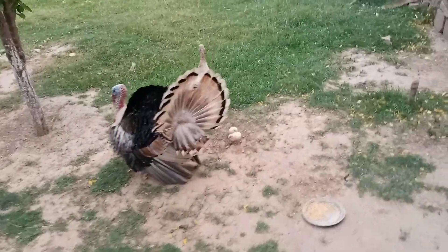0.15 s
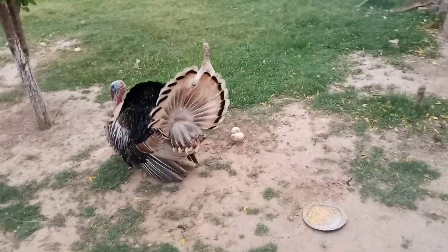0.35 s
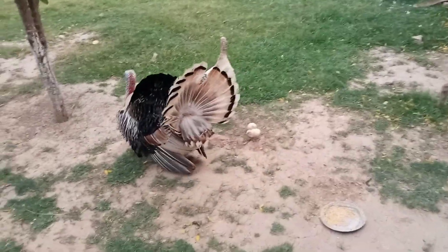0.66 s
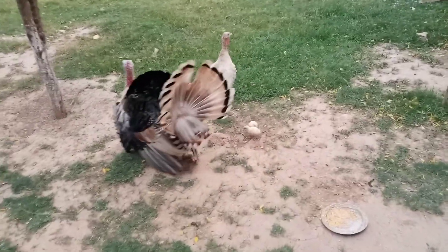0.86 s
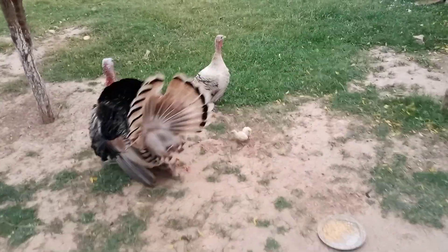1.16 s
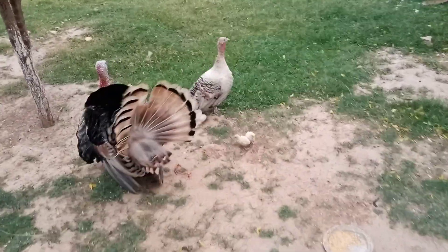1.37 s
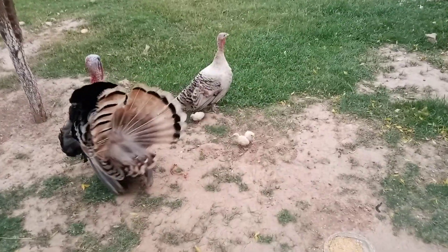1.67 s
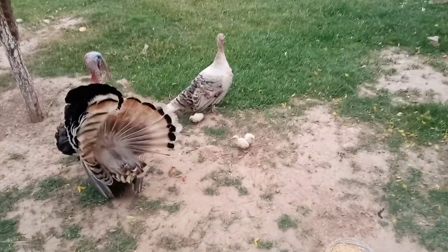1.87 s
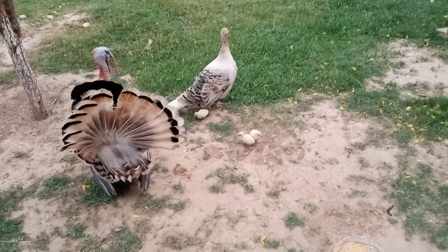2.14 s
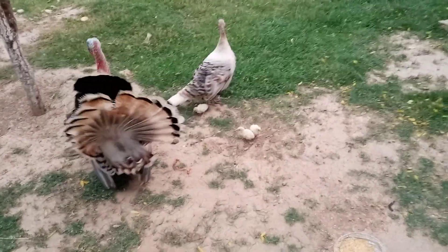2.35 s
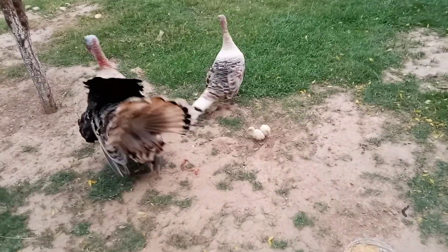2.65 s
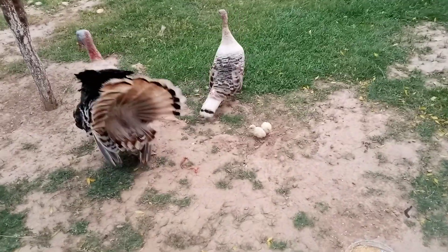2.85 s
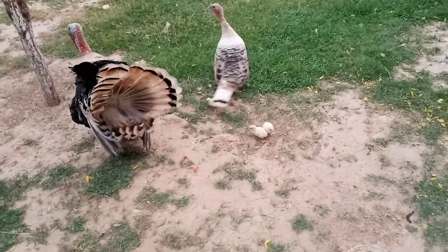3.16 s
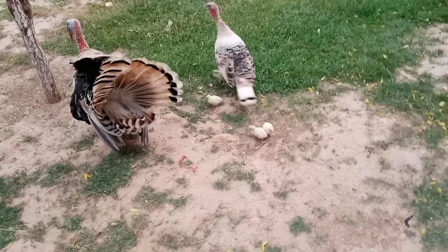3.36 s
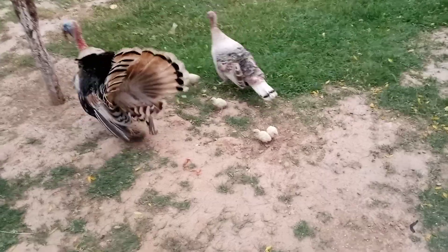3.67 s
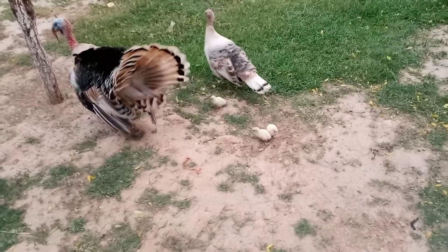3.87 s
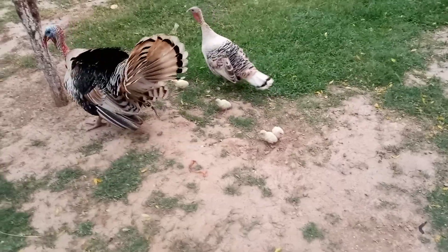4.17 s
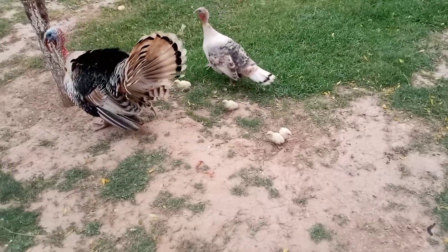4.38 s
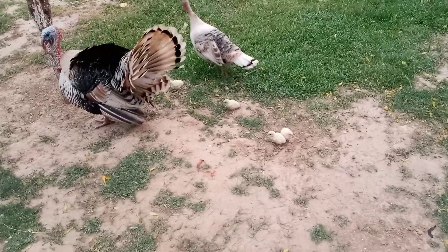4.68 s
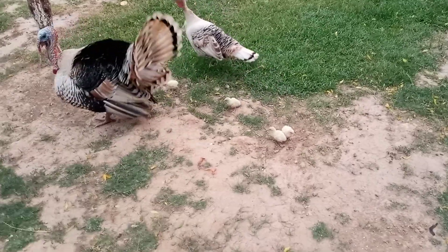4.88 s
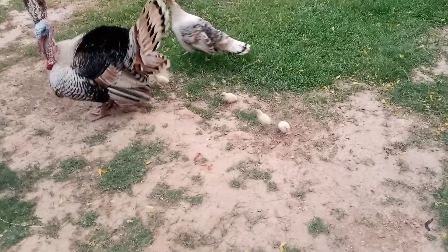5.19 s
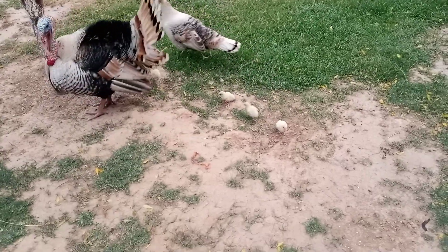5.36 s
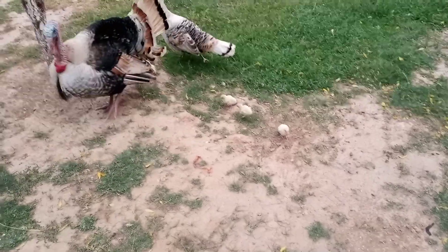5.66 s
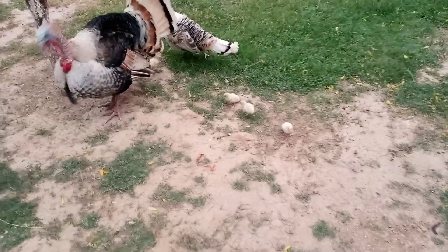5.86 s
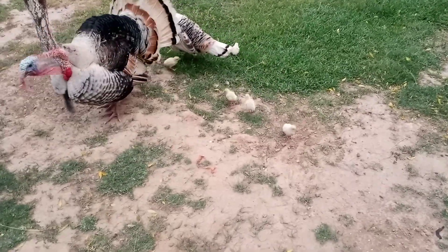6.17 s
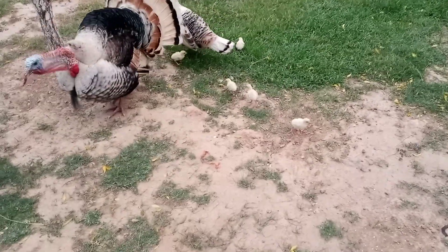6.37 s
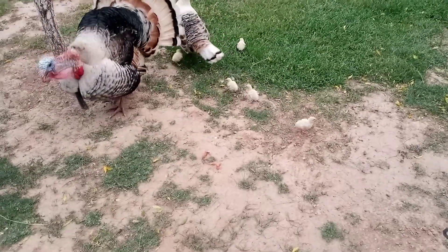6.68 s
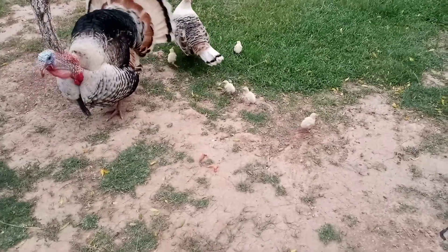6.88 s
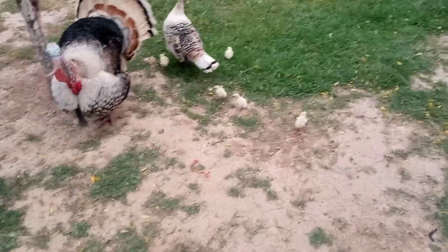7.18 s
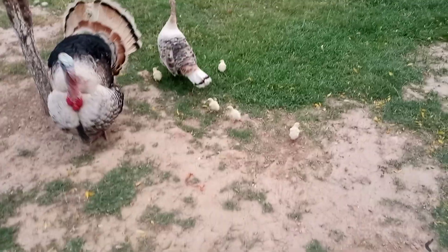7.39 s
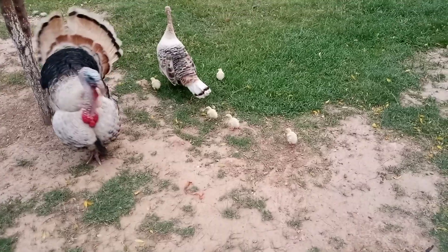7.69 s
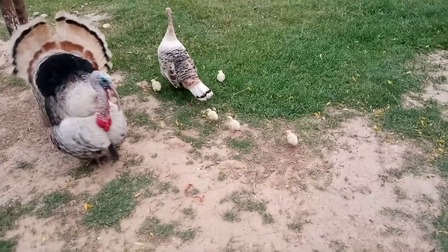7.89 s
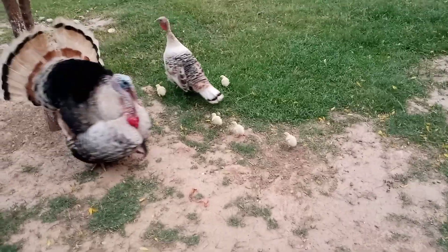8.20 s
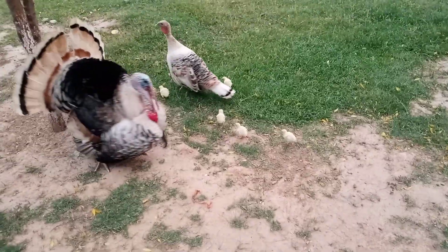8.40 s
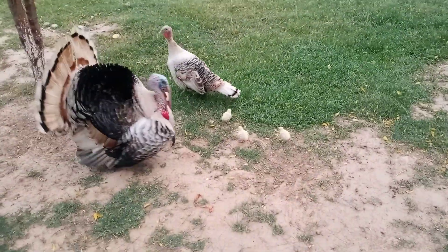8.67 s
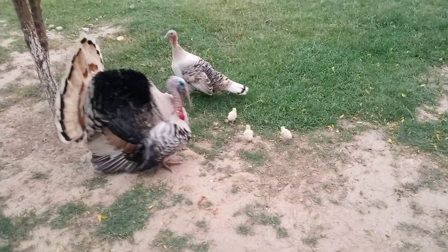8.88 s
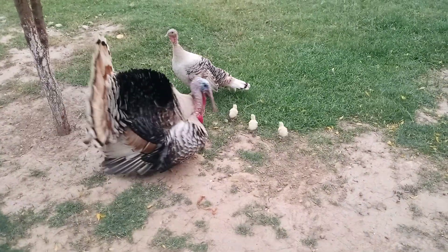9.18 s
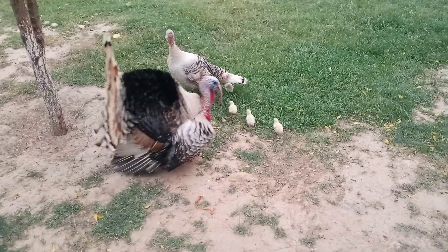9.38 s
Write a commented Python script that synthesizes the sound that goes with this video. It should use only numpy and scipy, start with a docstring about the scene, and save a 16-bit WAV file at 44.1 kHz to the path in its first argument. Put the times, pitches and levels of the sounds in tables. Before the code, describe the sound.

In a quiet farmyard, small birds cheep faintly over a soft hush, and there is one short gritty scuff. Puffs of wind thump on the microphone while turkey chicks peep and a hen turkey begins soft, falling yelps. Just past the middle, a male turkey gives one loud rattling gobble nearby, trailing off into gulps and squeaks. The yelps and cheeps carry on, with a few more wind thumps.

```python
"""A quiet hush lies over a farmyard lawn, with faint cheeps of small birds and one short scuff.
Puffs of air thump on the microphone, a hen turkey gives soft falling yelps and poults peep.
Then a tom gobbles once: three yaps, a cry, a rattle, a second cry, and gulps, squeaks and grunts.
His syrinx supplies clear or rough harmonics, which the resonance of his throat shapes;
the other birds sing gliding tones with a hoarse edge. The yard answers with a faint echo."""
import sys
import numpy as np
from scipy import signal
from scipy.fft import rfft, irfft, next_fast_len
from scipy.io import wavfile
from scipy.ndimage import uniform_filter1d, map_coordinates

SR = 44100
rng = np.random.default_rng(int(sys.argv[2]) if len(sys.argv) > 2 else 0)


def transcribe(signal):
    """Save signal, clipped to [-1, 1], as a 16-bit WAV file at the path in sys.argv[1]."""
    frames = np.atleast_2d(signal).T
    limited = np.clip(frames, -1, 1)
    pcm = np.round(limited * 32767).astype(np.int16)
    wavfile.write(sys.argv[1], SR, pcm)


N = 420713


def amp(db):
    """Amplitude ratio of a level in decibels."""
    return 10 ** (np.asarray(db) / 20)


def unit(x):
    """Normalisation to rms 1."""
    return x / np.sqrt(np.mean(x ** 2) + 1e-20)


def along(points, hz):
    """Interpolation of (Hz, value) points on a logarithmic frequency axis."""
    f, v = np.transpose(points)
    return np.interp(np.log(hz + 1), np.log(f + 1), v)


def wobble(rate, size):
    """Smooth random modulation: a spline through rate knots a second."""
    knots = rng.standard_normal(int(size * rate / SR) + 4)
    return map_coordinates(knots, [np.arange(size) * rate / SR])


def filtered(x, response):
    """Linear filtering: the spectrum is multiplied by a frequency response."""
    m = next_fast_len(len(x) + 8192)
    return irfft(rfft(x, m) * response(np.fft.rfftfreq(m, 1 / SR)), m)[:len(x)]


def noise(spectrum):
    """Spectral shaping of white noise, rms 1."""
    return unit(filtered(rng.standard_normal(N), lambda hz: amp(along(spectrum, hz))))


def add(track, s, sound):
    """Superposition of a sound on the track at s seconds."""
    part = track[max(round(s * SR), 0):][:len(sound)]
    part += sound[:len(part)]


def glide(length, *pitches):
    """Linear glide through evenly spaced pitches, one value a sample."""
    return np.interp(np.linspace(0, 1, int(length * SR)), np.linspace(0, 1, len(pitches)), pitches)


def arch(n, crest, fullness):
    """Amplitude envelope: a skewed half sine that peaks at the fraction crest of its length."""
    u = np.interp(np.linspace(0, 1, n), [0, crest, 1], [0, .5, 1])
    return np.abs(np.sin(np.pi * u)) ** fullness


def partial(phase, rough, width):
    """Line broadening: roughness moves power from a sinusoid into a narrow band of noise."""
    r, n = np.clip(rough, 0, 1), len(phase)
    smear = wobble(width, n) * np.sin(phase) + wobble(width, n) * np.cos(phase)
    return np.sqrt(2 * (1 - r ** 2)) * np.sin(phase) + r * smear


def reflection(x, delay_s, corner_hz):
    """Specular reflection: a delayed copy with less treble."""
    return filtered(x, lambda f: np.exp(-2j * np.pi * f * delay_s) / (1 + (f / corner_hz) ** 2))


# Spectrum of the hush. Each row: frequency in Hz, relative density in dB.
HUSH_SPECTRUM = [(88, -20), (150, -7), (210, -1.5), (280, -0.5), (325, -1.5), (412, -3.5), (907, -4),
                 (1900, -3.5), (2370, -2.5), (3200, -8), (3610, -6), (5400, -10.5), (6950, -11.5),
                 (7310, -14.5), (8360, -36.5), (10900, -69), (18400, -120)]
def hush(level_db=-56, early_db=2.07, settle_s=0.6):
    """Distant leaves and open air sum to broadband noise, a little stronger at first."""
    settling_db = early_db * np.exp(-(np.arange(N) / SR / settle_s) ** 2)
    return amp(level_db + settling_db + 0.4 * wobble(13, N)) * noise(HUSH_SPECTRUM)


# Reverberation of the yard. Each row: frequency in Hz, time to decay by 60 dB in seconds.
YARD_DECAY = [(300, 0.17), (1000, 0.69), (2500, 0.67), (8000, 0.17)]
def yard(x, tail_db=-19, wall_db=-20, wall_delay_s=0.034):
    """Reflection from a wall gives one soft echo; scattering by trees and ground gives a thin tail."""
    hz, t, spectra = signal.stft(rng.standard_normal(SR // 2), SR, nperseg=256)
    decay = amp(-60 * t / along(YARD_DECAY, hz)[:, None])
    tail = signal.istft(spectra * decay, SR, nperseg=256)[1]
    scatter = signal.fftconvolve(x, tail / np.linalg.norm(tail))[:N]
    return amp(tail_db) * scatter + amp(wall_db) * reflection(x, wall_delay_s, corner_hz=3500)


def ground(x, bounce_db=-13, delay_s=0.002287, patter_db=-15, patter_t60=0.14):
    """The soil's reflection interferes with the call; a trunk and nearby ground scatter it briefly."""
    t = np.arange(SR // 12) / SR
    patter = rng.standard_normal(len(t)) * amp(-60 * t / patter_t60) * (t > .005)
    scatter = signal.fftconvolve(x, patter / np.linalg.norm(patter))[:N]
    return x + amp(bounce_db) * reflection(x, delay_s, corner_hz=4000) + amp(patter_db) * scatter


# Puffs of air. Each row: end of the rise in seconds, hold in seconds, level in dB.
AIR_PUFFS = [(2.205, .1, -44), (2.36, 0.075, -50), (2.518, 0.085, -64), (3.096, 0.022, -40),
             (3.203, 0.023, -47.5), (3.436, .9, -60), (3.619, 0.036, -51), (3.754, 0.03, -59),
             (4.184, 0.041, -41.5), (4.765, 0.22, -48), (7.207, 0.081, -41), (7.502, 0.12, -54.5),
             (7.875, .075, -39), (8.034, 0.2, -40.5), (8.328, 0.18, -58.5)]
# Spectra of the rumble and of small eddies. Each row: frequency in Hz, relative density in dB.
RUMBLE_SPECTRUM = [(20, -51), (35, -12.5), (55, -2.5), (95, 1), (140, -2.5), (230, -13.5), (430, -28),
                   (600, -35.5), (1200, -89)]
EDDY_SPECTRUM = [(90, -24.5), (180, -2.5), (280, -1), (450, -5.5), (620, -20), (1100, -69.5)]
# The sharpest eddies. Each row: centre time in seconds, envelope peak in dB.
EDDY_THUMPS = [(2.221, -31), (2.255, -30), (2.294, -28.5), (3.113, -26), (3.218, -31), (3.64, -37),
               (3.953, -43), (4.204, -25.5), (4.805, -32), (4.964, -32), (7.252, -33.5), (7.929, -23.5),
               (8.05, -26.5)]
def buffeting(calm_db=-65, attack_s=0.0075, release_db_per_s=190, eddy_db=-52, eddy_growth=1.48,
              thump_hz=175, thump_cycles=0.3):
    """Turbulent pressure rumbles on the microphone; strong puffs are brighter, and sharp eddies thump."""
    flow = amp(calm_db + wobble(4, N))
    t = np.arange(2 * SR) / SR
    for s, hold, db in AIR_PUFFS:
        release_db = release_db_per_s * np.clip(t - attack_s - hold, 0, None)
        add(flow, s - attack_s, np.minimum(t / attack_s, 1) * amp(db - release_db))
    eddy_gain = amp(eddy_db + 6.2 * wobble(45, N)) * (flow / flow.max()) ** eddy_growth
    out = eddy_gain * noise(EDDY_SPECTRUM)
    out += flow * amp(3.7 * wobble(35, N)) * noise(RUMBLE_SPECTRUM)
    t = np.arange(-SR // 40, SR // 40) / SR
    bell = np.exp(-.5 * (t * thump_hz / thump_cycles) ** 2)
    for s, db in EDDY_THUMPS:
        push = bell * np.cos(2 * np.pi * thump_hz * t + rng.uniform(0, 2 * np.pi))
        add(out, s + t[0], amp(db) * push)
    return out


# Strokes of the scuff. Each row: start in seconds, level in dB, time to decay by 60 dB in seconds.
SCUFF_STROKES = [(0.5, -37, 0.075), (0.519, -45, 0.35)]
# Spectrum of the scrape. Each row: frequency in Hz, relative density in dB.
GRIT_SPECTRUM = [(29, -45), (50, 5), (244, -1), (863, -5.5), (2030, -9.5), (3550, -10), (5220, -16),
                 (6890, -12), (8360, -46), (10900, -74), (18400, -120)]
def scuff():
    """Gritty friction noise decays exponentially: a sharp start, then a softer drag."""
    out, t = np.zeros(N), np.arange(SR // 2) / SR
    for s, db, t60 in SCUFF_STROKES:
        add(out, s, amp(db - 60 * t / t60))
    return out * noise(GRIT_SPECTRUM)


# Hoarse edge of the high calls. Each row: frequency in Hz, relative density in dB.
RASP_SPECTRUM = [(1500, -50), (3000, -15.5), (4300, 6.5), (5500, -2), (6600, 1.5), (7500, -5), (8400, -21)]
def rasp():
    """The aperiodic part of a bird's voice: a band of treble noise."""
    return noise(RASP_SPECTRUM)


def peep(pitch, rough, edge, edge_db=-10, flutter_db=3.0):
    """Random frequency and amplitude modulation make a hoarse-edged whistle waver."""
    n = len(pitch)
    phase = 2 * np.pi * np.cumsum(pitch * (1 + .006 * wobble(90, n))) / SR
    swell = amp(flutter_db * wobble(67.4, n)) * arch(n, crest=.5, fullness=.5)
    start = rng.integers(N - n)
    tone = partial(phase, rough, width=700 + 1800 * rough ** 2)
    return swell * (tone + amp(edge_db) * edge[start:start + n])


# Rising cheeps; the row at 5.15 s is instead a thin rising line that sounds with the hen's yelp at 5.135 s.
# Each row: start in seconds, top pitch in Hz, level in dB.
RISING_CHEEPS = [(.2, 4050, -56), (.5, 4000, -56.5), (0.821, 3900, -59), (1.79, 3680, -63),
                 (2.4, 3740, -58.5), (2.74, 3720, -67), (2.952, 4250, -63), (3.225, 4530, -56),
                 (3.601, 4280, -56), (5.15, 4630, -52), (7.8, 4570, -61.5), (8.57, 4860, -64),
                 (8.92, 3590, -60.5)]
# Hoarse falling chirps, and at 5.291 s one short beak tick played as a 9 ms sweep. Each row: start in seconds,
# length in seconds, level in dB.
CHIRPS_AND_TICK = [(0.777, 0.076, -54.5), (1.51, 0.075, -60.5), (2.374, 0.09, -63.5), (3.11, 0.095, -61),
                   (3.889, 0.078, -54.5), (5.291, .009, -47.5), (5.4, 0.17, -54), (5.611, 0.087, -50.5),
                   (6.871, 0.067, -55), (9.019, 0.053, -54.5)]
# Thin arching whistles. Each row: start in seconds, top pitch in Hz, level in dB.
THIN_WHISTLES = [(1.4, 7050, -62), (2.69, 6500, -64.5), (3.362, 6910, -47.5), (8.589, 7180, -65),
                 (8.92, 7100, -65.5), (9.23, 7400, -67)]
def small_birds(cheep_s=.098, cheep_rise=.1, chirp_top_hz=5500, chirp_end_hz=3800,
                whistle_s=.095, whistle_arch=.025, blur_per_db=.065, far_db=-64, far_count=64):
    """Frequency sweeps make cheeps, chirps and whistles; farther birds cheep faintly at random."""
    out, edge = np.zeros(N), rasp()
    rising = lambda length, hz: glide(length, hz * (1 - cheep_rise), hz * (1 - cheep_rise / 4), hz)
    for s, hz, db in RISING_CHEEPS:
        blur = np.clip(.15 + blur_per_db * (-49.5 - db), .1, .8)  # distance blurs the faint ones
        add(out, s, amp(db) * peep(rising(cheep_s, hz), blur, edge))
    for s, length, db in CHIRPS_AND_TICK:
        add(out, s, amp(db) * peep(glide(length, chirp_top_hz, chirp_end_hz), .92, edge, edge_db=-9.5))
    for s, hz, db in THIN_WHISTLES:
        foot_hz = hz * (1 - whistle_arch)
        add(out, s, amp(db) * peep(glide(whistle_s, foot_hz, hz, foot_hz), 0.64, edge, edge_db=-5.5))
    for when, span, height in rng.random((far_count, 3)):
        pitch = rising(.05 + .05 * span, 3500 + 1300 * height)
        add(out, when * N / SR, amp(far_db) * peep(pitch, .55, edge))
    return out


# Near peeps. Each row: start in seconds, length in seconds, held pitch in Hz, level in dB.
POULT_PEEPS = [(3.401, .118, 4760, -48.5), (3.674, 0.19, 4760, -50.5), (4.01, 0.17, 4750, -48),
               (4.384, .15, 4840, -52)]
# Steady side lines. Each row: frequency in sevenths of the held pitch, relative level in dB.
POULT_SIDEBANDS = [(6, -8.5), (9, -12.5), (10, -17.5)]
def poults(scoop=0.03, scoop_s=0.018, drop=0.43, drop_s=0.015, crescendo_db=6, rough=0.23):
    """A carrier with sidebands: each peep scoops up, grows as it holds, and drops as the sides fade."""
    out, edge = np.zeros(N), rasp()
    for s, length, hz, db in POULT_PEEPS:
        t = np.arange(int(length * SR)) / SR
        pitch = hz * (1 - scoop * np.exp(-t / scoop_s) - drop * np.exp((t - length) / drop_s))
        crescendo = amp(crescendo_db * (t / length - .5))
        carrier = crescendo * peep(pitch, rough, edge, edge_db=-10.5, flutter_db=3.5)
        sides = sum(amp(line_db) * peep(np.full(len(t), hz * k / 7), rough, edge)
                    for k, line_db in POULT_SIDEBANDS)
        add(out, s, amp(db) * (carrier + np.sin(np.pi * t / length) * sides))
    return out


# Yelps. Each row: start in seconds, length in seconds, opening pitch in Hz, late pitch in Hz,
# level in dB, relative overtone level in dB.
HEN_YELPS = [(2.857, .19, 1135, 812, -45.5, -19), (4.183, 0.2, 925, 834, -41.5, -17.5),
             (4.551, 0.16, 1060, 847, -35.5, -11), (4.841, .15, 900, 937, -32.5, -17.5),
             (5.135, .13, 886, 960, -33, -13), (5.447, .13, 925, 889, -35, -10.5),
             (6.232, 0.17, 1110, 834, -36, -17), (7.087, .174, 1145, 801, -36, -17.5),
             (7.474, .13, 1140, 813, -34.5, -18.5), (7.917, .14, 1130, 797, -37, -16.5),
             (9.278, .17, 930, 808, -42.5, -14.5)]
def hen(mid_hz=886, rest_hz=763, scoop=0.184, scoop_s=0.01124, fullness=0.67,
        third_db=-8, fourth_db=-22, break_db=-13, husk_db=-20):
    """Nearly pure yelps scoop up; overtones open as they fall, and period doubling breaks the end."""
    out, husk = np.zeros(N), rasp()
    for s, length, opening_hz, late_hz, db, overtone_db in HEN_YELPS:
        n = int(length * SR)
        u = np.linspace(0, 1, n)
        contour = np.interp(u, [.2, .5, .83, 1], [opening_hz, mid_hz, late_hz, rest_hz])
        pitch = uniform_filter1d(contour, size=700, mode="nearest") * (1 + .011 * wobble(121, n))
        phase = 2 * np.pi * np.cumsum(pitch * (1 - scoop * np.exp(-u * length / scoop_s))) / SR
        crest = np.clip(0.59 + 1.2 * max(-41.5 - db, 0), .1, .9)  # weak yelps peak later
        strain = np.clip(pitch - 930, 0, None)  # above its easy range the voice is thin and quiet
        swell = arch(n, crest, fullness) * amp(wobble(60, n) - 0.013 * strain)
        overtones = partial(2 * phase, .14, 250) + amp(third_db) * partial(3 * phase, .16, 250)
        overtones += amp(fourth_db) * partial(4 * phase, .4, 300)
        overtones += amp(husk_db) * np.roll(husk, rng.integers(N))[:n]
        crack = amp(break_db) * np.clip((u - .65) / 0.27, 0, 1) * partial(1.5 * phase, .22, 200)
        voice = partial(phase, .08, 150) + amp(overtone_db - 0.31 * strain) * overtones
        add(out, s, amp(db) * (swell * voice + np.sqrt(swell) * crack))
    return out


# Spectral envelope of the tom's throat. Each row: frequency in Hz, relative gain in dB.
THROAT_RESPONSE = [(300, -28.5), (480, -22), (650, 2.5), (1000, -2), (1350, -6.5), (2000, -5.5),
                   (2700, -5.5), (3300, -14), (4300, -17.5), (5000, -21), (5350, -15), (5750, -23),
                   (6900, -18), (8200, -45.5)]
# Windpipe resonances. Each row: centre in Hz, bandwidth in Hz, relative gain in dB.
WINDPIPE_MODES = [(1100, 75, 5.5), (1960, 69, 8.5), (2730, 32, 10), (4040, 170, -36), (6670, 2000, -46)]
def syrinx(pitch, db, throat_hz, lift_db, rough, jitter=0.013, half_width_hz=400, husk_db=-13,
           dulling=.29, second_ratio=0.79, second_db=-5, harmonics=14):
    """Source and filter: harmonics pass through the throat, whose resonance jumps as the neck shakes."""
    size = len(pitch)
    phase = 2 * np.pi * np.cumsum(pitch * (1 + jitter * rough * wobble(360, size))) / SR
    k = np.arange(1, harmonics + 1)[:, None]
    sway_db = np.array([wobble(45, size) for n in k]) * np.clip(k - 2, 0, 4)
    # Softer syllables lose their highest harmonics.
    soft_db = dulling * np.clip(db + 24, -14, 0) * np.clip((k * pitch - 3000) / 3000, 0, 1)
    resonance_db = lift_db / (1 + ((k * pitch - throat_hz) / half_width_hz) ** 4)
    gains = amp(along(THROAT_RESPONSE, k * pitch) + sway_db + soft_db + resonance_db)
    gains /= np.linalg.norm(gains, axis=0)
    voice = sum(gain * partial(n * phase + rng.uniform(0, np.pi), rough * n, width=480)
                for n, gain in enumerate(gains, 1))
    # Biphonation: in rough syllables the other side of the syrinx joins in at a lower pitch.
    second = sum(amp(along(THROAT_RESPONSE, ratio * pitch)) * partial(ratio * phase, 0.41, width=380)
                 for ratio in second_ratio * k[1:, 0])
    # Turbulence rings the windpipe.
    pipe = lambda f: sum(amp(gain_db) * 1j * f * width / (hz * hz - f * f + 1j * f * width)
                         for hz, width, gain_db in WINDPIPE_MODES)
    husk = unit(filtered(rng.standard_normal(size), pipe)) * amp(husk_db) * np.sqrt(2 * np.abs(rough))
    return amp(db) * (voice + amp(second_db) * rough * second + husk)


def syllable(db, length, first_hz, last_hz, throat_hz, lift_db, rough,
             crest=0.43, fullness=0.66, crest_db=1.0):
    """A short glide of the syrinx under an envelope that swells and sinks."""
    pitch = glide(length, first_hz, last_hz)
    swell = amp(crest_db) * arch(len(pitch), crest, fullness)
    return swell * syrinx(pitch, db, throat_hz, lift_db, rough)


# The falling flick that opens a gulp. In order: length in seconds, first and last pitch in Hz,
# throat resonance in Hz, its lift in dB, roughness from 0 to 1.
GULP_FLICK = (0.019, 1280, 920, 860, 12.7, 0.26)
# Gulps, a flick and its landing note. Each row: start in seconds, flick level in dB,
# first and last pitch of the landing in Hz, landing level in dB.
TOM_GULPS = [(6.09, -34.5, 608, 588, -34), (6.143, -28.5, 750, 645, -35), (6.364, -30, 916, 1062, -24.5),
             (6.523, -38.5, 636, 622, -44.5)]
# Squeaks. Each row: start and length in seconds, mid pitch in Hz, level in dB, throat resonance in Hz.
TOM_SQUEAKS = [(6.301, 0.013, 1350, -39, 2640), (6.516, 0.019, 1340, -45.5, 2720),
               (6.562, .02, 1345, -36.5, 2650), (6.741, 0.025, 1240, -43, 1270)]
# Grunts. Each row: start and length in seconds, mid pitch in Hz, level in dB.
TOM_GRUNTS = [(6.247, 0.035, 606.6, -29.5), (6.32, 0.019, 593, -31.5), (6.456, .046, 299.6, -39),
              (6.687, 0.045, 300.7, -39)]
def dying_away(landing_delay_s=0.015, landing_s=0.024, squeak_sag=0.033, grunt_sag=0.047):
    """Intermittent voicing: the gobble breaks up into separate gulps, squeaks and grunts."""
    out = np.zeros(N)
    for s, flick_db, first_hz, last_hz, landing_db in TOM_GULPS:
        add(out, s, syllable(flick_db, *GULP_FLICK))
        landing = syllable(landing_db, landing_s, first_hz, last_hz,
                           throat_hz=last_hz, lift_db=12.5, rough=0.16, crest=0.55)
        add(out, s + landing_delay_s, landing)
    for s, length, hz, db, throat_hz in TOM_SQUEAKS:
        add(out, s, syllable(db, length, hz * (1 + squeak_sag), hz * (1 - squeak_sag),
                             throat_hz, lift_db=7.5, rough=.06))
    for s, length, hz, db in TOM_GRUNTS:
        add(out, s, syllable(db, length, hz * (1 + grunt_sag), hz * (1 - grunt_sag),
                             throat_hz=590, lift_db=27, rough=0.12, fullness=0.51))
    return out


# The rattle's two notes. Each gives: length in seconds, first and last pitch in Hz,
# throat resonance in Hz, its lift in dB, roughness from 0 to 1.
HIGH_NOTE = (0.0088, 935, 885, 2200, 57, 0.13)
LOW_NOTE = (0.03, 745, 685, 370, 4.5, 0.28)
def rattle(start_s=5.843, period_s=.0485, first_db=-25.5, high_db=-3.5, flip_s=.01, fade_db=0.45):
    """Pitch alternation: a short high note flips to a rough low one, about twenty times a second."""
    out = np.zeros(N)
    for beat in range(3):
        s, db = start_s + beat * period_s, first_db - beat * fade_db
        add(out, s, syllable(db + high_db, *HIGH_NOTE))
        add(out, s + flip_s, syllable(db, *LOW_NOTE))
    return out


# Two long cries, a list for each. Each row: time in seconds, pitch in Hz, relative level in dB,
# weight of the fundamental against the throat resonance in dB, that resonance in Hz.
CRY_CONTOURS = [
    [(5.769, 637, -27, -16.5, 1370), (5.779, 653, -13.5, -24.5, 1360), (5.799, 760, -29, 0.5, 1350),
     (5.813, 751, -23.5, -0.5, 1350), (5.823, 649, -28, -2.5, 1380), (5.835, 680, -30.5, 1.5, 1450)],
    [(5.965, 678, -30.5, -7, 1390), (5.977, 579, -22.5, -6.5, 1470), (5.991, 660, -18.5, -4, 1660),
     (6.003, 600.5, -30.5, 2.5, 1810), (6.023, 650, -16.5, -12, 1940), (6.047, 688, -16, -1, 2020),
     (6.07, 662, -40, -7, 2020)],
]
def cries(gain_db=-2.5, lift_db=-0.5, clear_db=-22, rough_per_db=-0.14, clear_rough=0.037, waver=0.0025):
    """Long notes, clear when pushed and rough when slack; resonance grows at the fundamental's cost."""
    out = np.zeros(N)
    for rows in CRY_CONTOURS:
        s, *columns = np.transpose(rows)
        t = np.arange(s[0], s[-1], 1 / SR)
        pitch, db, fundamental_db, throat_hz = [np.interp(t, s, column) for column in columns]
        pitch *= 1 + waver * wobble(150, len(t))
        # Negative roughness adds jitter, husk and the second voice without broadening the harmonics.
        rough = clear_rough + rough_per_db * np.clip(clear_db - db, 0, None)
        voice = syrinx(pitch, db + gain_db, throat_hz, lift_db - fundamental_db, rough)
        add(out, s[0], signal.windows.tukey(len(t), .06) * voice)
    return out


# Opening yaps. Each row: start in seconds, level in dB, length in seconds, first and last pitch in Hz,
# throat resonance in Hz, its lift in dB, roughness from 0 to 1.
TOM_YAPS = [(5.671, -22, .021, 638, 564, 2100, 14.5, 0.1), (5.708, -31, 0.027, 662, 726, 1400, 19.5, .04),
            (5.752, -20, .027, 591, 659, 2140, 23, 0.04)]
def gobble(thrum_db=-53, thrum_hz=86, octave_db=-9, thrum_growth=0.18):
    """The tom's syllables in a chain; their envelope modulates a faint low thrum of the chest."""
    out = rattle() + dying_away()
    for s, *shape in TOM_YAPS:
        add(out, s, syllable(*shape))
    out += cries()
    effort = np.abs(uniform_filter1d(np.abs(out), size=1800))
    phase = 2 * np.pi * thrum_hz * np.arange(N) / SR
    thrum = partial(phase, 1.0, width=36) + amp(octave_db) * partial(2 * phase, 1.0, width=140)
    return out + amp(thrum_db) * (effort / effort.max()) ** thrum_growth * thrum


def scene(distance_db=6):
    """Direct and reflected sound add; the small birds, farther off, are the more reverberant."""
    near = ground(gobble()) + hen() + scuff()
    far = poults() + small_birds()
    return (near + far + yard(near + amp(distance_db) * far) + buffeting() + hush())[None]


def record(dry, low_cut_hz=52, top_hz=8330):
    """Band limiting: the microphone sheds the deepest rumble and the highest treble."""
    low_pass = lambda hz: np.clip((top_hz - hz) / 500 + .5, 0, 1)
    high_pass = lambda hz: hz ** 2 / np.hypot(hz ** 2, low_cut_hz ** 2)
    return np.array([filtered(x, lambda hz: low_pass(hz) * high_pass(hz)) for x in dry])


dry = scene()
out = record(dry)
transcribe(out)
```